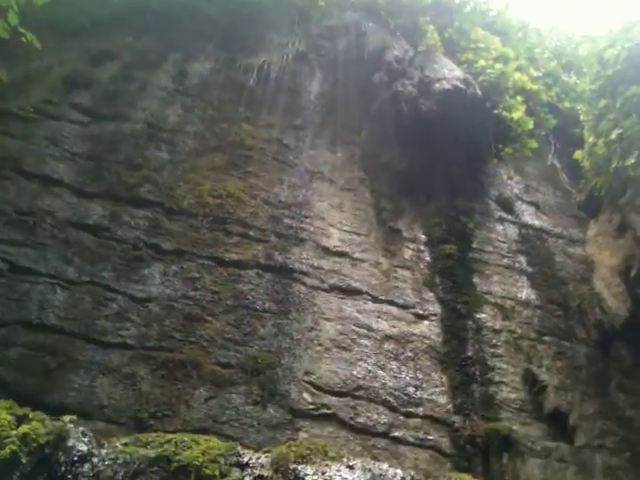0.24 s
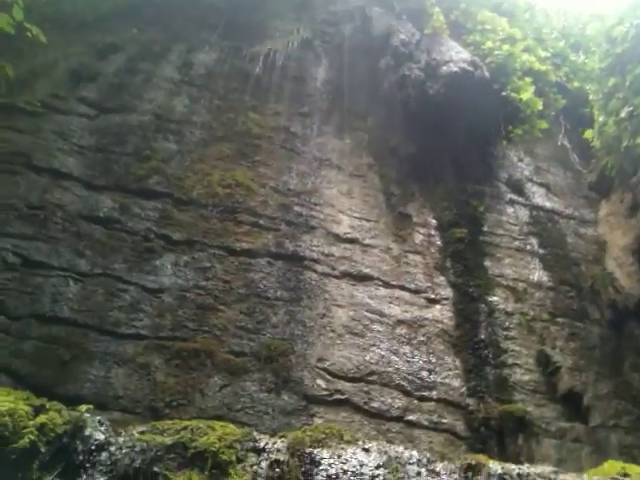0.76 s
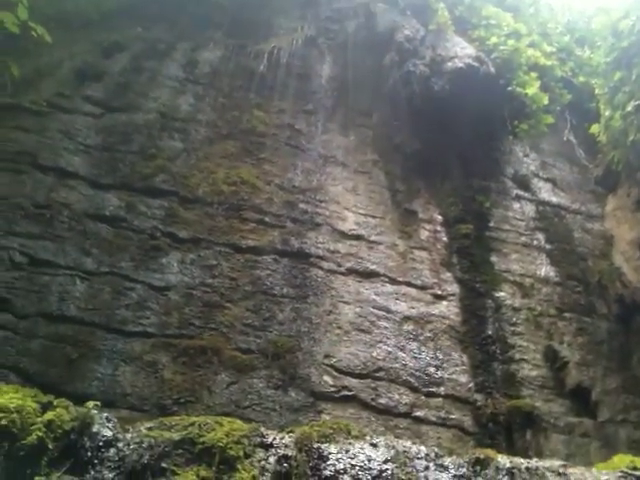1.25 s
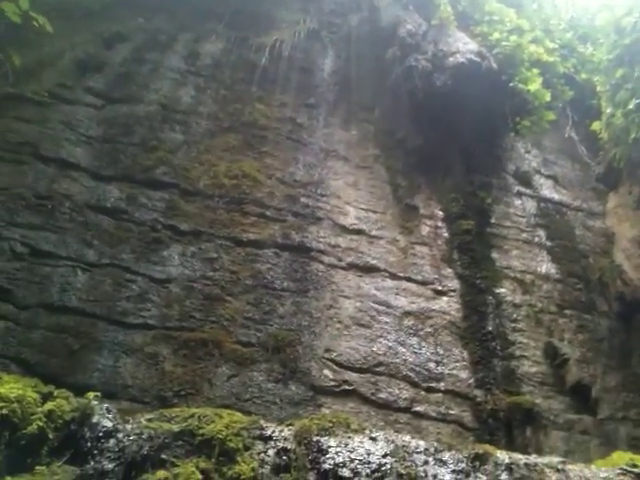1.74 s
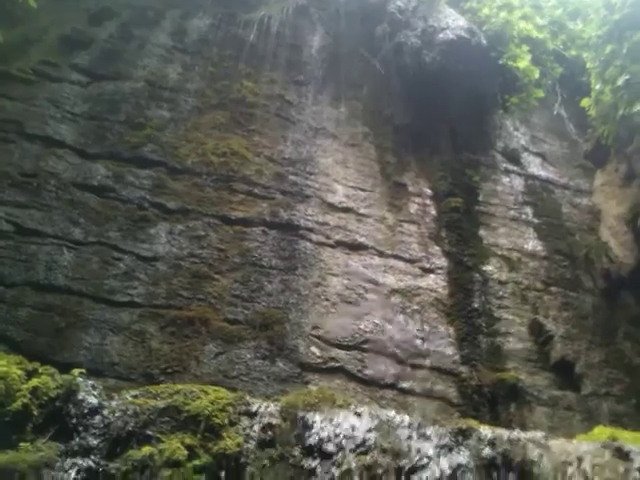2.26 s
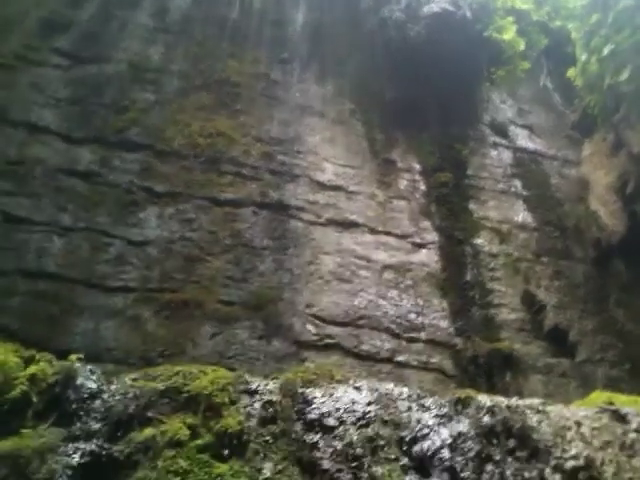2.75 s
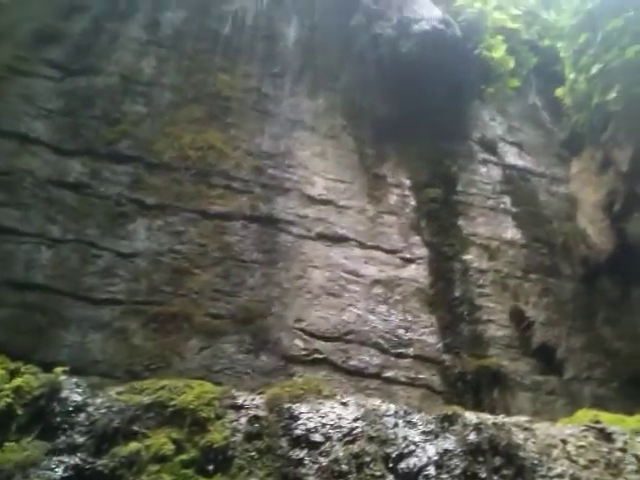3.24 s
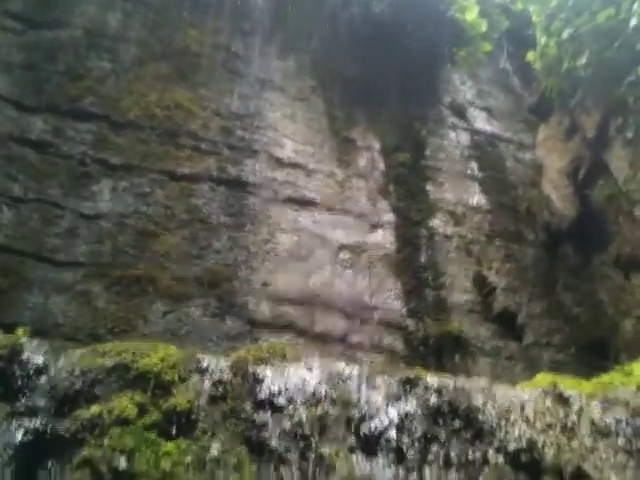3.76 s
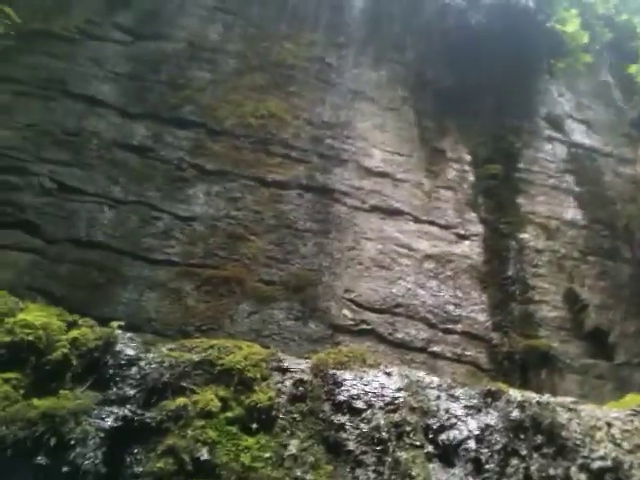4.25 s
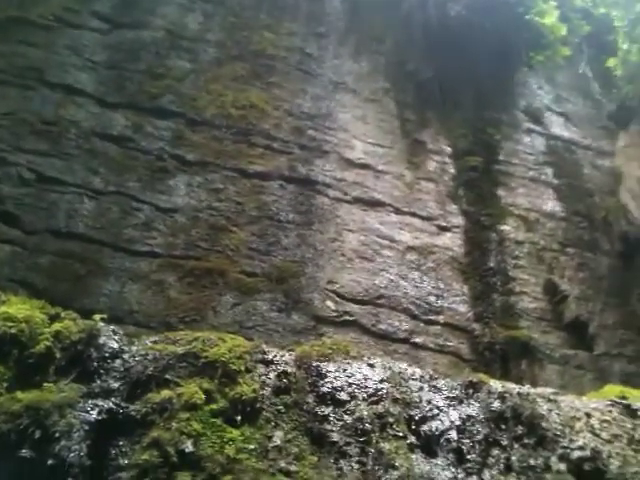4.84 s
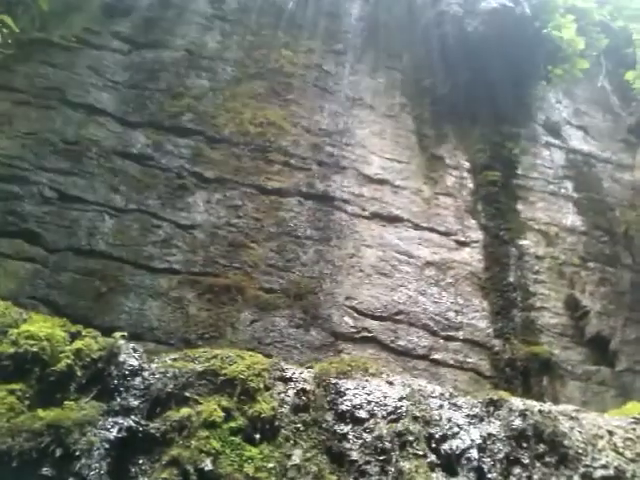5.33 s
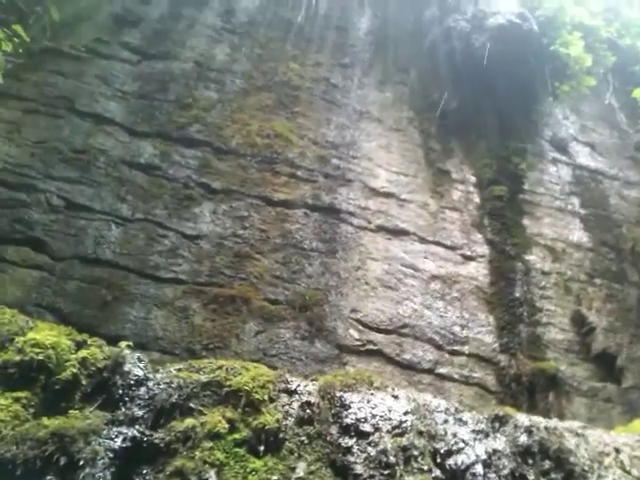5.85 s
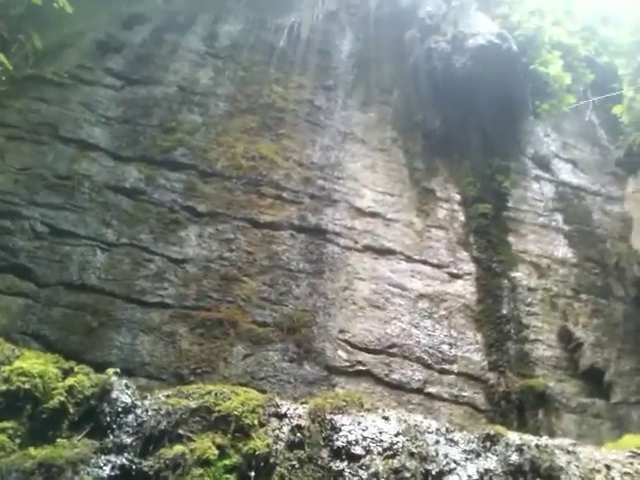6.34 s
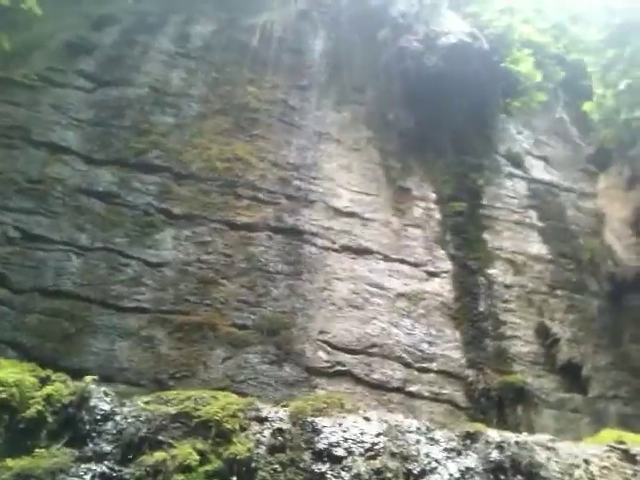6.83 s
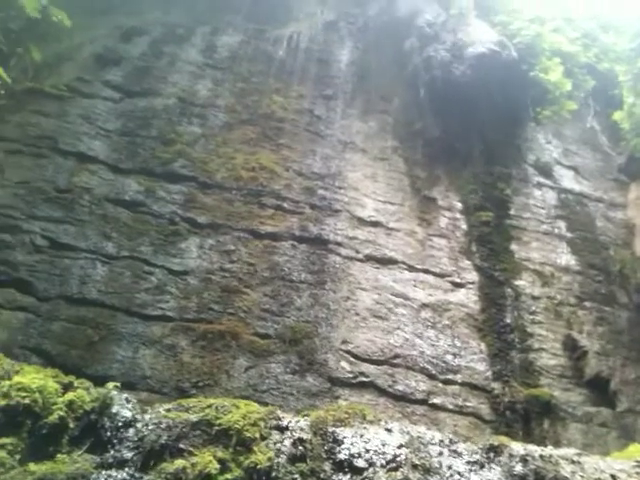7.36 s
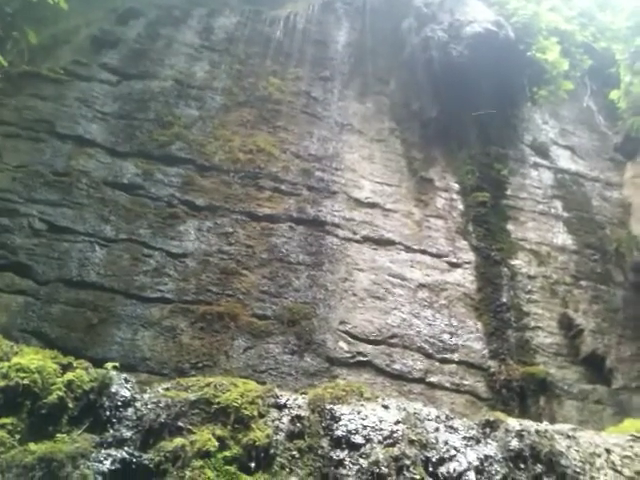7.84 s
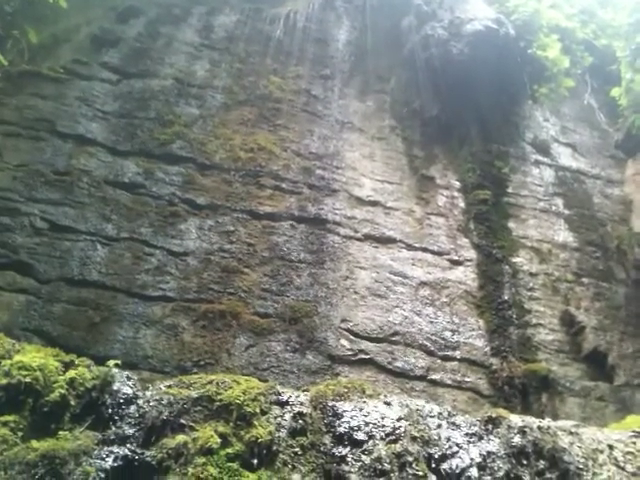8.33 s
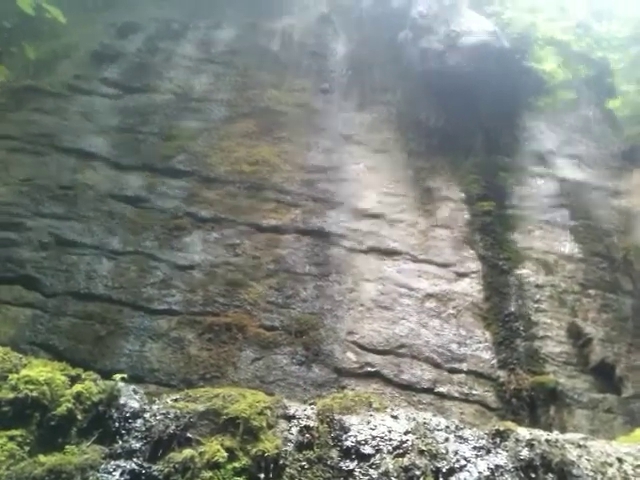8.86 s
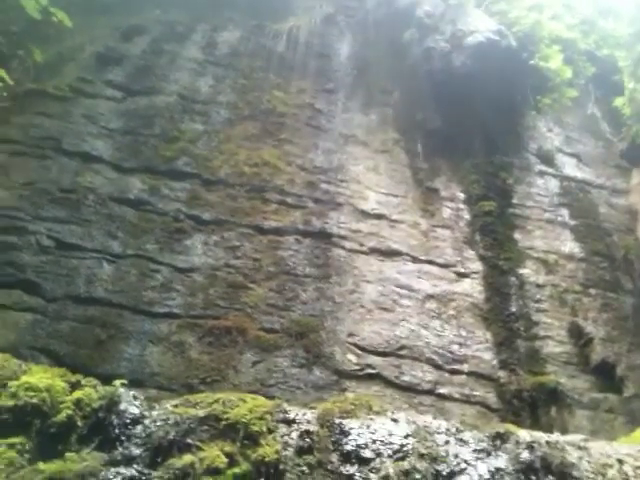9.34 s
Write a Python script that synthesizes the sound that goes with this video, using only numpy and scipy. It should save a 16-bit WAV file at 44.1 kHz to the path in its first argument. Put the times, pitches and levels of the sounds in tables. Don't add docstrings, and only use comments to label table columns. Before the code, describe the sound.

Thin water streams hiss steadily onto stone and moss, with hollow drips, bubbly plinks and a few hard drop thumps on the microphone.

```python
import sys
import numpy as np
from scipy import signal
from scipy.io import wavfile
from scipy.ndimage import uniform_filter1d

SR = 44100
rng = np.random.default_rng(int(sys.argv[2]) if len(sys.argv) > 2 else 0)


def log_audio(samples):
    frames = np.atleast_2d(samples).T
    limited = np.clip(frames, -1, 1)
    pcm = np.round(limited * 32767).astype(np.int16)
    wavfile.write(sys.argv[1], SR, pcm)


def boost(x):
    u = np.asarray(x, float) / 20
    return 10 ** u


N = 422919
STEP = 40


def rms_one(x):
    return x / np.sqrt(np.mean(x ** 2) + 1e-20)


def drift(rate):
    r = np.exp(-2 * np.pi * rate * STEP / SR)
    noise = rng.standard_normal(N // STEP + 2002)
    settled = signal.lfilter([1], [1, -2 * r, r * r], noise)[2000:]
    return rms_one(settled)


def band_pass(x, edges):
    return signal.sosfilt(signal.butter(2, edges, "band", fs=SR, output="sos"), x)


def ring(clicks, hz, t60):
    r, w = boost(-60 / (t60 * SR)), 2 * np.pi * hz / SR
    return signal.lfilter([0, np.sin(w)], [1, -2 * r * np.cos(w), r * r], clicks + 1e-18)


def add(out, s, sound):
    i = round(s * SR)
    out[i:i + len(sound)] += sound[:N - i]


def swell(rise_s):
    t = np.arange(round(9 * rise_s * SR)) / SR
    return t, t / rise_s * np.exp(1 - t / rise_s)


def spray(low_surge_db, high_surge_db, own_db, grain_db):
    # t/s, turn (-1 away to 1 towards the stream), tilt (-1 down to 1 up), flow/dB
    hand_and_flow = [(0, -0.28, -0.42, -0.8), (.45, 0.085, -.5, 0.3), (1.1, -0.064, -0.41, -.4),
                     (1.4, -0.34, -.5, 0), (1.6, 0.016, -0.24, 1.2), (2.3, 0.15, 0.2, 0.1),
                     (2.7, -0.57, .1, 0), (3.05, -0.76, 0, 1), (3.6, -0.77, 0, 0), (3.95, -0.9, 0.023, 0.5),
                     (4.25, 0.46, 0.84, 1), (5.5, 0.66, 1, 0.1), (6.1, 0.62, 0, 0), (7.3, 0.66, 0, .3),
                     (8, 0.94, -0.086, 0.6), (8.95, .8, 0, 0.5), (9.15, 0.47, 0, 0.5), (9.59, 1, 0, 1)]
    # f/Hz, level/dB
    water_colour = [(60, -3), (100, -9.5), (150, -15), (300, -19), (475, -7.5), (640, -16.5), (770, -5.5),
                    (1270, -5.5), (1960, -1.5), (2850, -2), (4500, 1.5), (6900, 2.5), (12700, -3.5),
                    (15500, -5)]
    # f/Hz, dB per unit of turn, dB per turn squared, dB per unit of tilt
    housing_shade = [(1710, 0, 0.5, 0), (2510, 5, 1.3, 0.9), (3750, -4, 0.5, 0.8), (4900, -0.4, -1, .6),
                     (5700, 1.1, 0.41, -0.5), (6700, 2, 2.2, -2.5), (8300, 0.6, 0.25, 1),
                     (10500, 0.5, -1, -1)]
    spray_db = -45

    shade_hz, *shades = np.transpose(housing_shade)
    times, *controls = np.transpose(hand_and_flow)
    hz_points, db_points = np.transpose(water_colour)
    low_surge = low_surge_db * (0.67 * drift(4.2) + drift(46))
    high_surge = high_surge_db * (0.99 * drift(8.6) + drift(37))
    together = 0.71 * drift(21)
    grain = boost(grain_db * rng.standard_normal((2, N)))
    white = rng.standard_normal((2, N)) * grain
    slow_t, t = np.arange(len(low_surge)) * STEP / SR, np.arange(N) / SR
    turn, tilt, flow_db = (np.interp(slow_t, times, column) for column in controls)
    out, edges = np.zeros(N), 55 * 2 ** np.arange(0, 8.3, 1 / 4)
    for k, (low, high) in enumerate(zip(edges, edges[1:])):
        centre = np.log(low * high) / 2
        band = band_pass(white[k % 2], [low, high])
        straight, bent, tipped = (np.interp(centre, np.log(shade_hz), column) for column in shades)
        level_db = np.interp(centre, np.log(hz_points), db_points) + flow_db
        level_db = level_db + straight * turn + bent * turn ** 2 + tipped * tilt
        coarse = np.interp(centre, np.log([1200, 4500]), [1, 0])
        surge_db = coarse * low_surge + (1 - coarse) * high_surge + own_db * drift(15.6) + together
        surge_db *= np.interp(centre, np.log([8000, 13000]), [1, .7])
        out += band * np.interp(t, slow_t, boost(level_db + surge_db))
    return boost(spray_db) * rms_one(out)


def drips(table, cycles, rise, trim_db):
    out = np.zeros(N)
    for (s, db, hz), (length, phase) in zip(table, rng.random((len(table), 2))):
        swell_s = cycles * (0.643 + 0.698 * length) / hz
        t, envelope = swell(swell_s)
        turns = hz * (t + rise * hz * t * t) + phase
        add(out, s - 1.277 * swell_s, boost(db + trim_db) * envelope * np.sin(2 * np.pi * turns))
    return out


def puffs(table, spread, trim_db):
    out = np.zeros(N)
    for s, db, hz, length_ms in table:
        rise_s = np.clip(length_ms - 2.0, 1.5, 20) / 2300
        t, envelope = swell(rise_s)
        noise = band_pass(rng.standard_normal(5000), [hz / spread, min(hz * spread, 15000)])
        add(out, s - 1.2 * rise_s, boost(db + trim_db) * envelope * rms_one(noise)[-len(t):])
    return out


def strays(table, later_db):
    spread_s, stray_db, spread_db, pitch_spread = .07, -50.5, 2.5, 0.086
    out = []
    for (s, _, hz, *rest), (a, b, c) in zip(table, rng.standard_normal((len(table), 3))):
        stray_s = np.clip(s + spread_s * a + .02 * np.sign(a), .05, N / SR - .02)
        out.append((stray_s, stray_db + later_db + spread_db * b, hz * np.exp(pitch_spread * c), *rest))
    return out


def around(table, hz):
    chance = rng.standard_normal(len(table))
    return [(s, db, hz * np.exp(0.076 * c)) for (s, db), c in zip(table, chance)]


def hollow_drips():
    # t/s, peak level/dB, f/Hz
    wide_drips = [(.293, -43, 830), (.399, -49, 745), (.527, -43, 830), (0.593, -42.5, 825),
                  (1.005, -44.5, 830), (1.174, -41, 840), (1.626, -38, 820), (1.991, -42.5, 830),
                  (2.139, -45.5, 830), (2.354, -42.5, 760), (2.514, -41.5, 790), (2.667, -46, 806),
                  (2.7, -44.5, 810), (3.078, -44.5, 770), (3.652, -44.5, 780), (3.728, -48, 820),
                  (4.367, -43.5, 860), (4.434, -45, 730), (4.811, -47, 730), (5.294, -40.5, 850),
                  (5.845, -42, 880), (5.877, -41.5, 790), (5.902, -43, 810), (6.417, -44, 870),
                  (7.953, -43, 830), (8.326, -41.5, 804), (8.484, -42, 830), (8.569, -46.5, 830),
                  (9.21, -47.5, 804), (9.255, -42, 870)]
    # t/s, peak level/dB, f/Hz
    crack_drips = [(.244, -46, 870), (0.732, -37, 1110), (.931, -41.5, 990), (.972, -44.5, 1030),
                   (1.234, -47, 960), (1.779, -47, 865), (2.267, -48, 1130), (2.477, -45, 910),
                   (2.738, -47, 840), (2.892, -46.5, 1080), (3.112, -51, 920), (3.752, -48, 1080),
                   (4.029, -45, 980), (4.136, -44, 1000), (4.228, -44, 950), (4.688, -48, 810),
                   (4.926, -44.5, 990), (5.81, -40, 980), (6.441, -45, 980), (6.49, -47, 880),
                   (7.247, -51, 860), (7.34, -44.5, 920), (7.503, -41.5, 910), (7.671, -49, 1050),
                   (7.885, -47, 880), (8.403, -48, 1020), (8.693, -48, 1140), (8.931, -47, 1100)]
    # t/s, peak level/dB
    soft_drips = [(.025, -51), (.154, -49), (.351, -45), (.445, -49), (.509, -48.5), (.553, -47),
                  (.903, -46), (1.097, -51), (1.355, -48), (1.665, -46), (1.738, -49), (1.805, -46),
                  (2.069, -51), (2.318, -46.5), (2.419, -47), (2.792, -50), (3.584, -44.5), (4.343, -47),
                  (5.396, -45), (5.727, -47), (5.77, -44.5), (5.834, -45), (6.395, -46), (7.696, -46),
                  (7.979, -47), (8.009, -49), (8.605, -48), (8.637, -49), (9.055, -45), (9.572, -47.5)]
    # t/s, peak level/dB
    deep_drips = [(.24, -50), (.394, -55), (1.624, -49.5), (2.063, -54), (2.512, -51), (2.664, -52),
                  (3.074, -48.5), (3.649, -53), (4.33, -45.5), (4.585, -54), (5.884, -54), (6.411, -51),
                  (7.869, -53.5), (8.321, -48), (8.73, -47), (9.047, -50)]
    wide_hz, deep_hz = 830, 481

    landing = wide_drips + crack_drips + around(soft_drips, wide_hz)
    deep = around(deep_drips, deep_hz)
    deep += [(s - .003, db - 21, deep_hz) for s, db, _ in wide_drips]
    out = drips(landing + strays(crack_drips, -4.0), 1.61, 0.00084, 0.28)
    out += drips(deep, 1.27, 0.0026, 0.89)
    return out + puffs([(*row, 8.0) for row in landing], 1.46, -10.5)


def puddle_bubbles():
    # t/s, peak level/dB, f/Hz
    small_bubbles = [(.203, -41, 2580), (.731, -44, 1490), (.994, -42, 2020), (1.084, -36.5, 3040),
                     (1.149, -45, 2200), (1.594, -42, 2370), (1.918, -42, 3040), (2.355, -40.5, 1520),
                     (2.398, -42, 2660), (2.496, -40.5, 2640), (4.047, -41.5, 2640), (4.268, -38, 2400),
                     (4.635, -42.5, 2450), (4.914, -40, 2670), (4.976, -44, 2360), (5.26, -43.5, 1560),
                     (5.333, -42, 2270), (5.374, -38.5, 2580), (5.516, -38, 3040), (5.838, -36, 2450),
                     (6.168, -42, 2400), (6.358, -41, 2550), (6.731, -43, 2650), (6.869, -41.5, 2380),
                     (7.417, -43.5, 2450), (7.497, -38, 2860), (8.501, -44, 2690), (8.857, -40, 2750),
                     (8.921, -45, 2270), (9.312, -42, 2350)]
    # t/s, peak level/dB, f/Hz
    plinks = [
        (.971, -39, 5300),
        (1.268, -48, 4700),
        (1.779, -41, 5250),
        (3.928, -55, 3900),
        (6.112, -43, 4900),
        (9.094, -45, 5060),
    ]
    bubbles = small_bubbles + strays(small_bubbles, 3.7)
    out = drips(bubbles, 5.51, 0.00093, -5.5) + drips(plinks, 12.0, 0.00054, 0.5)
    return out + puffs([(*row, 7.0) for row in bubbles], 1.24, -5)


def stone_splashes():
    # t/s, peak level/dB, centre f/Hz, length/ms
    bursts = [(.368, -42, 6600, 4.1), (.445, -41, 6630, 6.1), (.465, -41.5, 5100, 8.4),
              (.535, -34.5, 6140, 3.9), (.811, -39, 6990, 4.7), (1.027, -43.5, 4870, 13),
              (1.265, -40.5, 5030, 25), (1.779, -38, 5060, 4.7), (2.198, -44, 6730, 10.5),
              (2.297, -38, 5080, 5.5), (2.354, -43, 4930, 7.2), (3.928, -42, 3890, 11),
              (4.129, -43, 4170, 11), (4.201, -38, 7150, 10), (4.583, -39, 6560, 7.1),
              (4.749, -43, 5300, 9), (5.112, -39, 6700, 4.5), (5.364, -42, 6480, 6.2),
              (5.839, -41, 6430, 12.4), (6.112, -39, 5800, 8.3), (6.357, -38, 5850, 3.8),
              (7.073, -39, 6700, 4.7), (7.159, -38, 6490, 4.4), (7.387, -41, 7690, 7.2),
              (7.509, -37, 7000, 9.7), (7.831, -36, 7220, 6.4), (8.362, -41, 6320, 5.5),
              (8.82, -44, 2700, 40), (9.094, -38, 6470, 4.9), (9.571, -38.5, 6910, 16)]
    return puffs(bursts + strays(bursts, 6.6), 1.275, -1.4)


def pushes(table):
    cushion_hz = 1500
    out = np.zeros(N)
    for s, push_db, contact_ms, front in table:
        share = np.linspace(0, 1, round(contact_ms * SR / 1000))
        add(out, s, boost(push_db) * np.sin(np.pi * share ** front) ** 1.55)
    softened = signal.sosfilt(signal.butter(2, cushion_hz, fs=SR, output="sos"), out + 1e-18)
    return np.roll(softened, -round(SR / (4 * cushion_hz)))


def ticks(blows):
    # f/Hz, level/dB, swell/cycles
    grille_modes = [(8300, 1, 2.1), (10500, -1.5, 1.3), (2400, -6.5, 0.86)]
    tick_db = [-32, -30, -25, -28.5, -27]
    knock_db = [-34, -33, -26, -42, -40]
    out, clicks = np.zeros(N), np.zeros(N)
    times = [s for s, *_ in blows]
    for hz, mode_db, cycles in grille_modes:
        out += drips([(s + 0.0004, db, hz) for s, db in zip(times, tick_db)], cycles, 0, mode_db)
    clicks[[round(s * SR) for s in times]] = boost(knock_db)
    out += puffs([(s + 0.0011, db, 4500, 3.5) for s, db in zip(times, tick_db)], 2.7, -10)
    return out + ring(clicks, 552, 0.017)


def housing_blows():
    # t/s, push level/dB, contact/ms, front shape (under 1 steep)
    thumps = [
        (4.5212, -13.8, 4.07, .63),
        (6.5454, -10.2, 3.81, .84),
        (7.4603, -8.6, 2.85, 1.38),
        (8.9456, -8.7, 2.89, .93),
        (9.3279, -8.8, 2.68, 1.06),
    ]
    # t/s, push level/dB, contact/ms, front shape (under 1 steep)
    bumps = [(2.192, -47, 10.5, 1), (2.268, -53, 4.4, 0.81), (2.41, -58, 8.0, 1), (2.625, -54, 6.0, 1),
             (2.98, -48, 7, 0.81), (3.049, -48, 5.0, 0.86), (3.082, -50, 5.0, 0.87),
             (3.812, -41.5, 3.6, 0.63), (4.035, -53, 4, 1), (4.058, -50, 5.1, 1), (5.775, -58, 8.0, 0.92)]
    return boost(0.9) * pushes(thumps + bumps) + ticks(thumps)


def patter(per_s, low_hz, high_hz, cycles, level_db):
    sizes = boost(4.2 * np.minimum(rng.exponential(1, N), 3)) * rng.choice([-1, 1], N)
    born = rng.random(N) < per_s / SR
    dealt = rng.integers(0, 8, N)
    rings = np.zeros(N)
    for k, hz in enumerate(np.geomspace(low_hz, high_hz, 8)):
        struck = ring(sizes * born * (dealt == k), hz, cycles / hz)
        rings += ring(struck, hz, cycles / hz)
    return boost(level_db) * rms_one(rings)


def scene():
    water = spray(low_surge_db=1.92, high_surge_db=.5, own_db=1.15, grain_db=2.5)
    water += hollow_drips() + puddle_bubbles() + stone_splashes()
    blows = housing_blows()
    water += patter(140, 733, 1120, 8.5, -64.0)
    water += patter(40, 430, 560, 6.0, -73.0)
    water += patter(300, 1485, 6100, 8.2, -67.5)
    return np.tile(water + blows, (2, 1))


def low_cut(x):
    # corner f/Hz, resonance Q
    sections = [(163, 1.28), (168, .83)]
    for hz, q in sections:
        w = 2 * np.pi * hz / SR
        a, c = np.sin(w) / (2 * q), np.cos(w)
        x = signal.lfilter(np.array([1, -2, 1]) * (1 + c) / 2, [1 + a, -2 * c, 1 - a], x + 1e-18)
    return x


def dropouts(x, depth_db):
    hz, t, cells = signal.stft(x, SR, nperseg=1024, noverlap=512)
    chance = uniform_filter1d(rng.standard_normal(cells.shape[1:]), size=4, axis=0)
    chance = rms_one(uniform_filter1d(chance, size=5, axis=1))
    rarity = np.interp(hz, [8000, 11000, 13500, 15800], [3.0, 1.7, 1.0, .6])
    wander = .2 * drift(1.5)[:len(t) * 12:12]
    lost = chance > rarity[:, None] + wander
    thinned = cells * np.where(lost, boost(depth_db), 1)
    return signal.istft(thinned, SR, nperseg=1024, noverlap=512)[1][:, :N]


def low_pass(x):
    return signal.sosfilt(signal.butter(12, 15850, fs=SR, output="sos"), x)


def record(dry):
    top_cut = signal.ellip(12, .5, 70, 15730, fs=SR, output="sos")
    mix = signal.sosfilt(top_cut, low_cut(dry))
    mix = dropouts(mix, depth_db=-30)
    return low_pass(mix)


dry = scene()
out = record(dry)
log_audio(out)
```